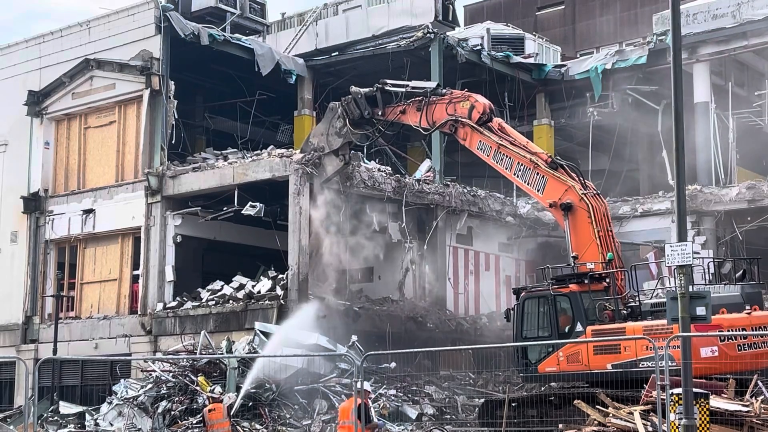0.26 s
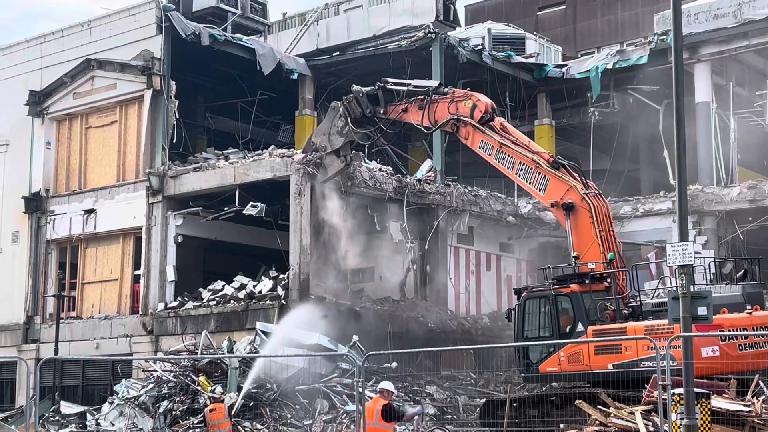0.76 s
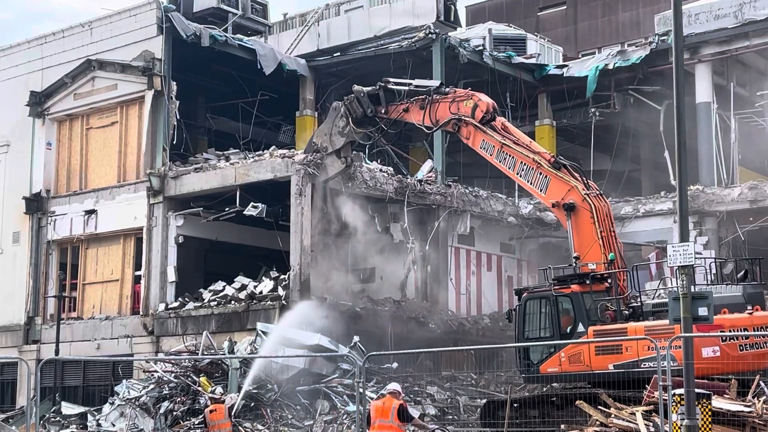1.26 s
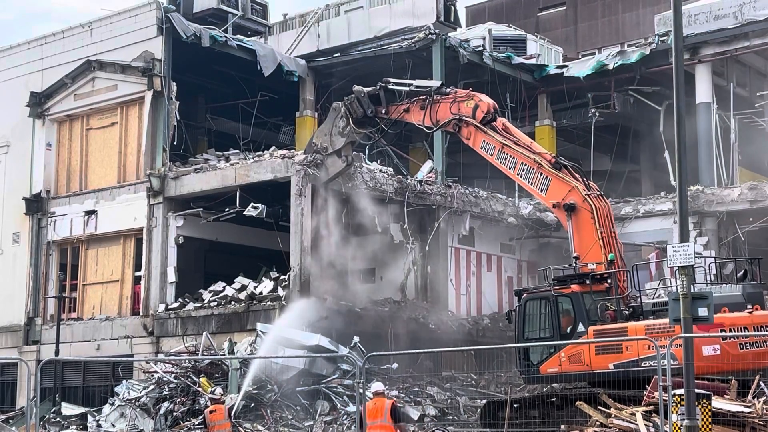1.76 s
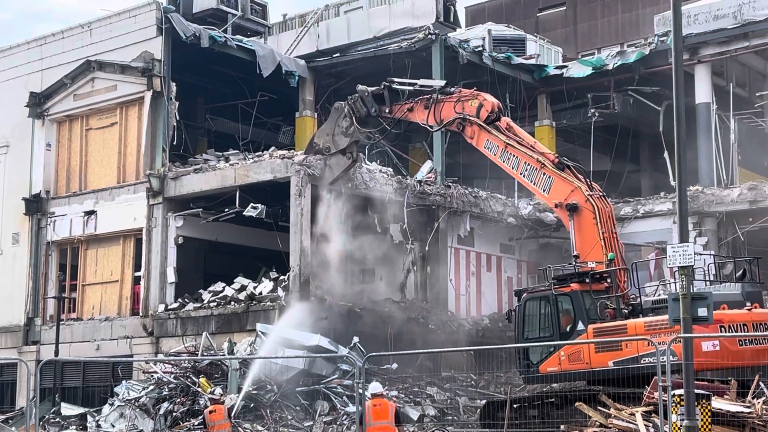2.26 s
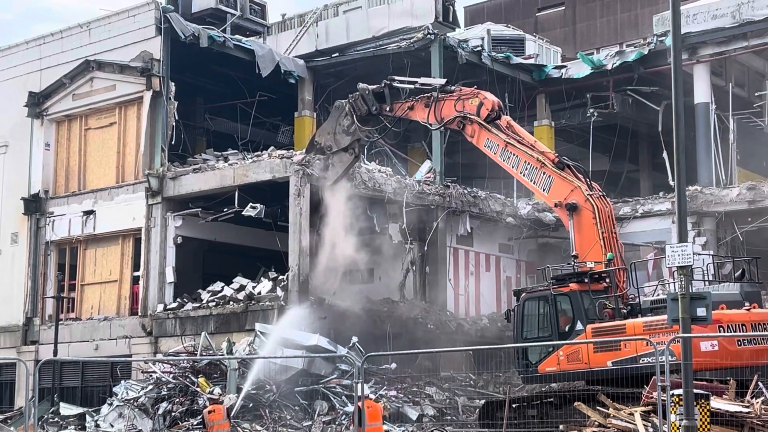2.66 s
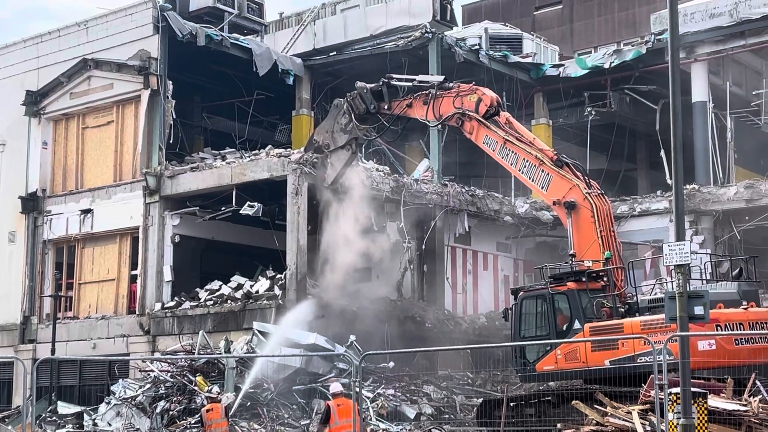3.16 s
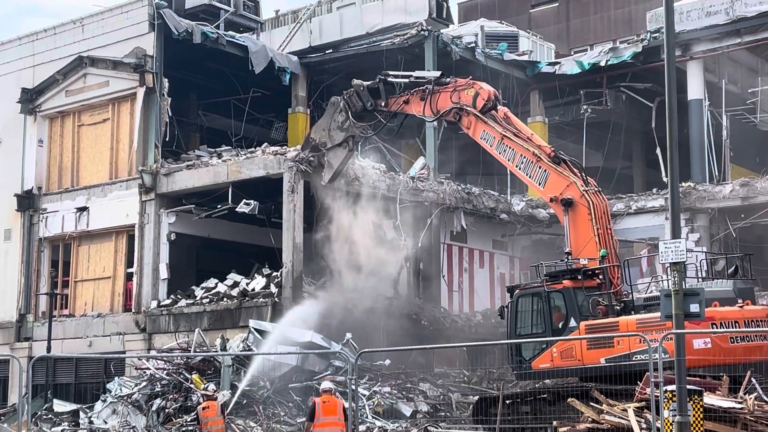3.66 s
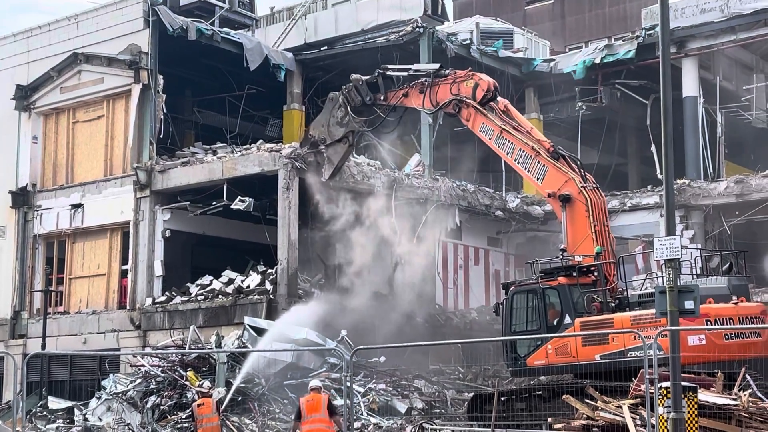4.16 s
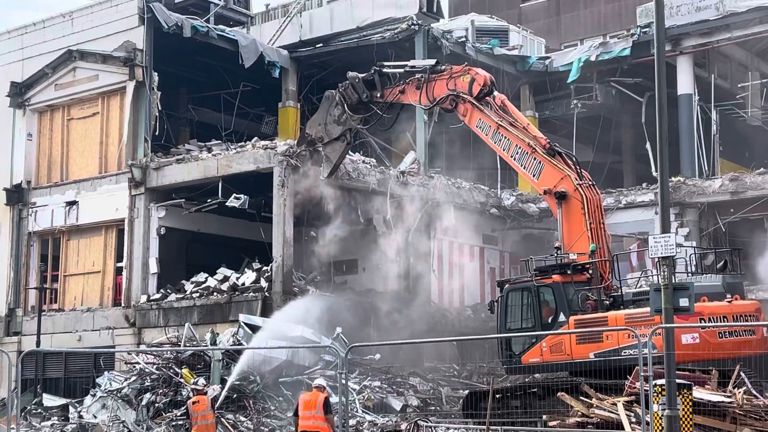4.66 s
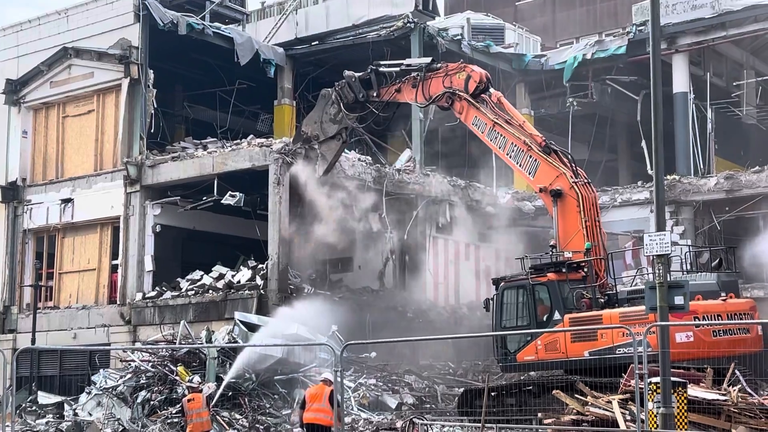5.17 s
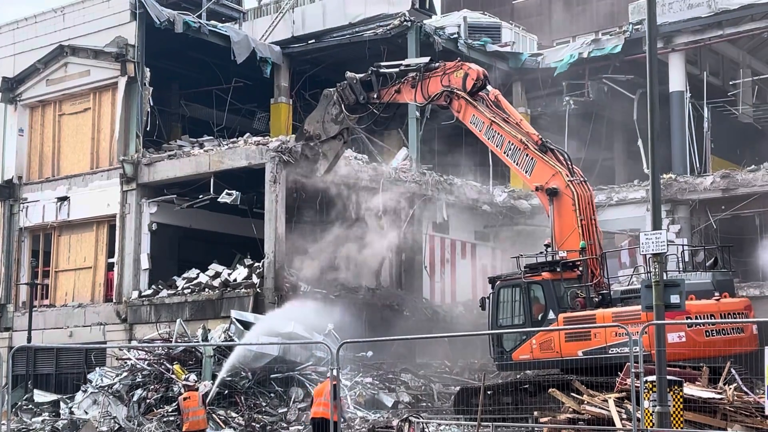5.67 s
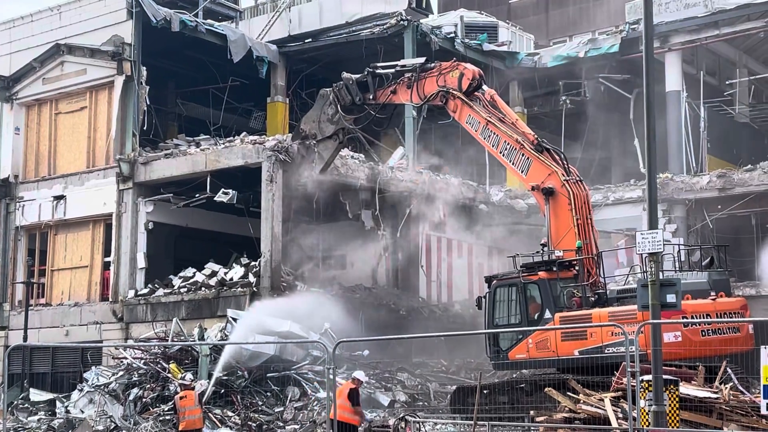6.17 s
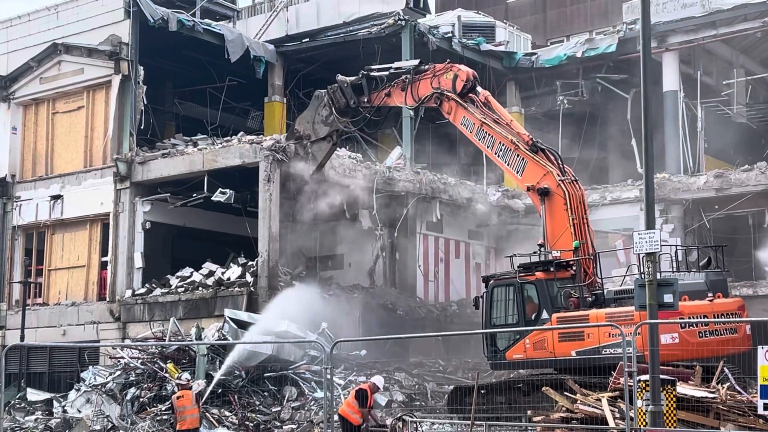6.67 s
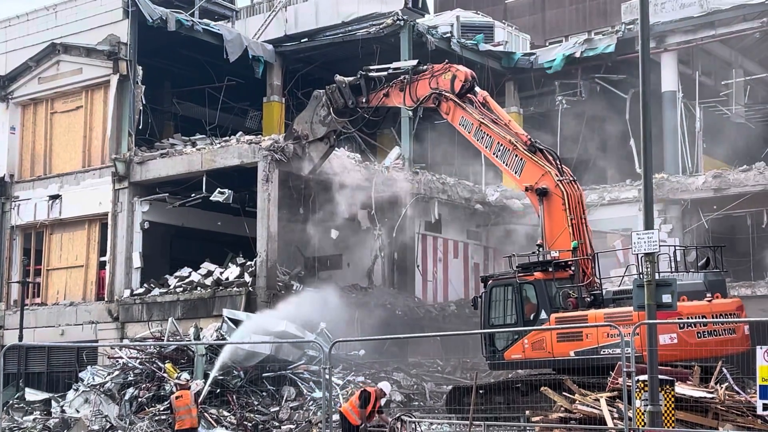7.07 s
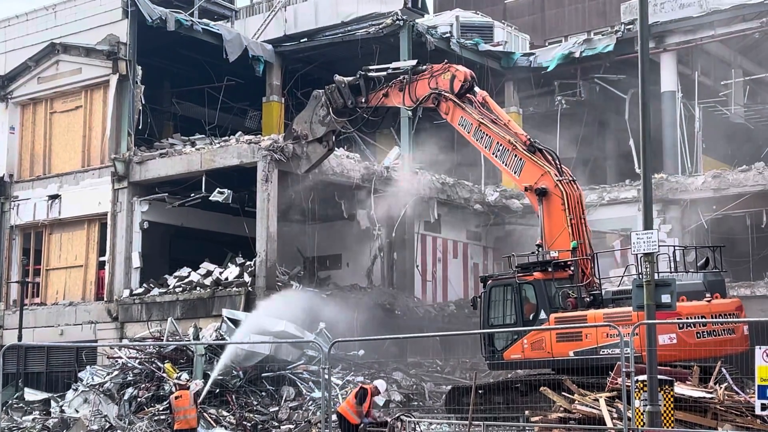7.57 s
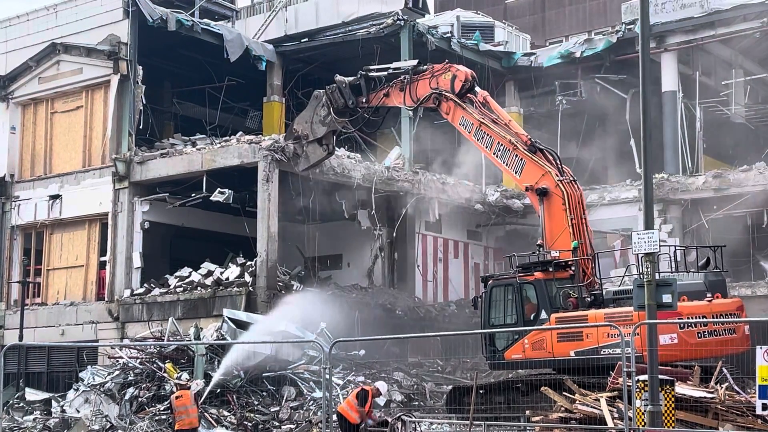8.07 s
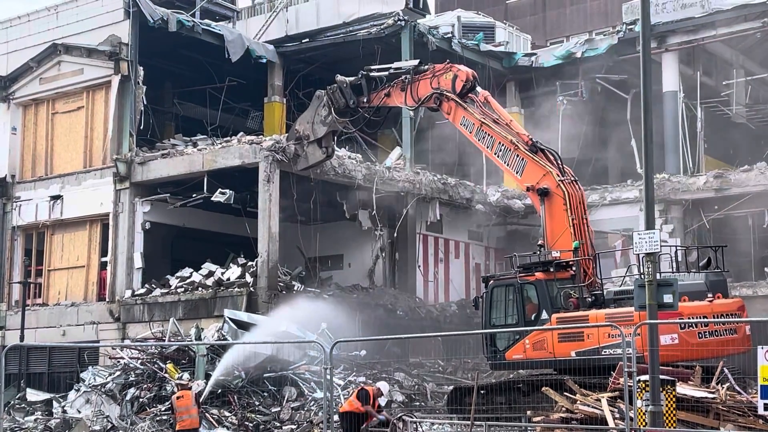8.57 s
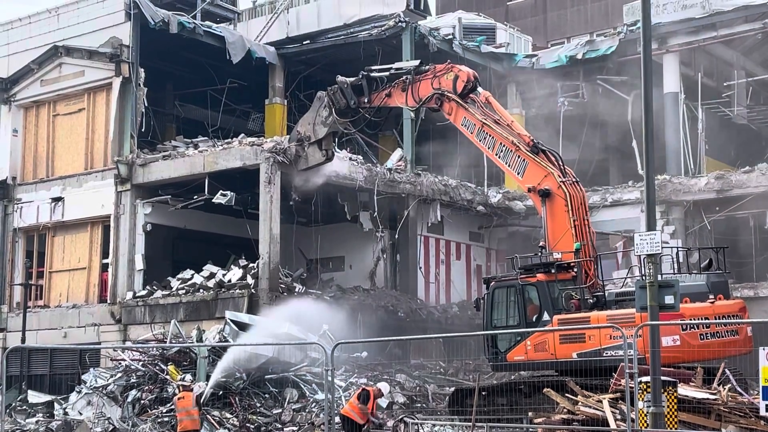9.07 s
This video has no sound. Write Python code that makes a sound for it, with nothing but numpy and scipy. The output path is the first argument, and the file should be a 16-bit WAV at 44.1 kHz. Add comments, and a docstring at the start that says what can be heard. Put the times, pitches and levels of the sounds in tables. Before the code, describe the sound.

Outdoors across a street from a demolition site, in stereo, with a diffuse echo under a second long from the house fronts. From 0 to about 4.3 s lumpy low gusts buffet the microphone, heaviest before 2.5 s. Beneath them a diesel engine on the right knocks rapidly, a hose hisses and fine grit trickles steadily. Sharp concrete cracks with showers of splinters come near 1.2, 2.2, 3 and 3.5 s, with thin high squeaks and a short metallic groan at 2.2 s. At 5.1 s a bright clank and crack start a tumble; the engine drone swells, and heavy blocks crash down at 5.6 to 6 s, the loudest thud just before 6 s. Smaller clanks, crunches and settling stones follow to 7.5 s, the engine dipping briefly near 6.9 s. A tiny steel chirp sounds at 8.3 s, then jaws grind in coarse bites from 8.6 s to the end at about 9.3 s, with low wind rumble returning.

```python
"""An excavator's hydraulic crusher breaks a concrete building, heard from across the street.
Cracks, splinters, rubble and clanks are noise or ringing modes under short envelopes, echoed by the house fronts.
A diesel engine knocks at its firing rate; grit trickles and a hose hisses against the dust, both from noise.
Gusts of low-passed turbulence buffet the microphone, mostly in the first half."""
import sys
import numpy as np
from scipy import signal
from scipy.fft import rfft, irfft, next_fast_len
from scipy.io import wavfile
from scipy.ndimage import uniform_filter1d

SR = 44100
rng = np.random.default_rng(int(sys.argv[2]) if len(sys.argv) > 2 else 0)


def put_to_file(sound):
    """Save the sound as 16-bit audio at rate SR, in the file named by the first command-line argument."""
    columns = np.atleast_2d(sound).T  # one column per channel
    safe = np.clip(columns, -1, 1)
    whole_steps = np.round(safe * 32767)
    wavfile.write(sys.argv[1], SR, whole_steps.astype(np.int16))


N = 411012
TIME = np.arange(N) / SR
# Event levels in the tables are before the dB trims among each function's settings.
# Every *_TONE is a relative spectrum: the coloured sound is scaled to unit rms.


def from_db(db):
    """Decibels to gain."""
    return 10 ** (np.asarray(db) / 20)


def rms_one(x):
    """Scale to unit rms."""
    return x / np.sqrt(np.mean(x ** 2) + 1e-20)


def in_time(rows):
    """Read each column of a breakpoint curve at every sample."""
    s, *columns = np.transpose(rows)
    return [np.interp(TIME, s, column) for column in columns]


def at_hz(points, hz):
    """Read a table on a log-frequency axis."""
    f, value = np.transpose(points)
    return np.interp(np.log(hz + 1e-3), np.log(f), value)


def filtered(x, response):
    """Apply a frequency response, given as a function of Hz."""
    size = next_fast_len(N + SR // 2)
    hz = np.arange(size // 2 + 1) * SR / size
    return irfft(rfft(x, size) * response(hz), size)[..., :N]


def coloured(x, tone):
    """Give a signal a spectrum that falls away beyond its ends; rms 1."""
    lowest, highest = tone[0][0], tone[-1][0]

    def response(hz):
        low_cut = hz ** 2 / (hz ** 2 + (lowest / 2) ** 2)
        high_cut = 1 / (1 + (hz / highest / 2) ** 4)
        return from_db(at_hz(tone, hz)) * low_cut * high_cut
    return rms_one(filtered(x, response))


def drift(rate):
    """Smooth random wander of unit rms; the rate in Hz sets its speed."""
    step = 40  # samples between the points of the wander
    r = np.exp(-2 * np.pi * rate * step / SR)
    noise = rng.standard_normal(N // step + 2002)
    slow = signal.lfilter([1], [1, -2 * r, r * r], noise)[2000:]
    return np.interp(np.arange(N) / step, np.arange(len(slow)), rms_one(slow))


def steadied(x, size=2600):
    """Take the slow swells out of a sound and keep its grain; size in samples."""
    return x / np.sqrt(uniform_filter1d(x ** 2, size=size) + 1e-4)


def blows(times, levels_db, t60s, rise_s):
    """Envelope of blows that swell quickly and die away, summed in power."""
    power = np.zeros(N)
    for s, db, t60 in zip(times, levels_db, t60s):
        start = max(int(s * SR), 0)
        age = TIME[:min(N - start, SR)]
        decay = from_db(db - 60 * age / max(t60, .02))
        power[start:start + len(age)] += (decay * (1 - np.exp(-age / rise_s))) ** 2
    return np.sqrt(power)


def swells(rows, attack_s, release_s):
    """Envelope of sounds that rise, hold for their length and die away, summed in power."""
    power = np.zeros(N)
    for s, length, db in rows:
        start = max(int(s * SR), 0)
        age = TIME[:min(N - start, int((length + 10 * release_s) * SR))]
        rise = np.clip(age / attack_s, 0, 1)
        fall = np.exp(-np.maximum(age - length, 0) / release_s)
        power[start:start + len(age)] += (from_db(db) * rise * fall) ** 2
    return np.sqrt(power)


def stones(tone, per_s, spread_db, cycles, count=22):
    """Stones of many sizes knock at random; each falls by 60 dB in a few cycles of its own pitch."""
    out = np.zeros(N)
    hits = int(per_s * N / SR / count) + 1  # for each size of stone
    for hz in np.geomspace(tone[0][0], min(tone[-1][0], SR / 3), count):
        clicks = np.full(N, 1e-18)
        moments = rng.integers(0, N, hits)
        signs = rng.choice([-1, 1], hits)
        clicks[moments] = signs * from_db(spread_db * np.minimum(rng.exponential(1, hits), 4))
        r, w = from_db(-60 * hz / (cycles * SR)), 2 * np.pi * hz / SR
        ringing = signal.lfilter([1, 0, -1], [1, -2 * r * np.cos(w), r * r], clicks)
        out += np.sqrt(hz) * rms_one(ringing)
    return steadied(coloured(out, tone))


def placed(x, side):
    """Share a sound between left and right, band by band."""
    def shares(hz):
        ratio = from_db(at_hz(side, hz))
        return 2 * np.array([ratio, np.ones_like(ratio)]) / (1 + ratio)
    return filtered(x, shares)


# echo between the house fronts: (f/Hz, level/dB against the direct sound)
STREET_ECHO = [(60, -22), (250, -7), (600, -4.5), (2100, -5.5), (3200, -29), (12000, -10.5)]
STREET_T60_S = 0.81


def street(x):
    """Add the diffuse echo of the house fronts as decaying noise, different in each ear."""
    age = TIME[:SR]
    late = age > .006  # the first reflection needs time to return
    tail = rng.standard_normal((2, SR)) * from_db(-60 * age / STREET_T60_S) * late
    echo = signal.fftconvolve(x, rms_one(tail) / np.sqrt(SR), axes=-1)[:, :N]
    return x + filtered(echo, lambda hz: from_db(at_hz(STREET_ECHO, hz)))


def turbulence(tone, apart, size):
    """Wind noise common to both microphone ports, plus a share that differs between them."""
    common = steadied(coloured(rng.standard_normal(N), tone), size=size)
    return common + apart * coloured(rng.standard_normal((2, N)), tone)


# single eddies within the gusts: (t/s, length/s, level/dB, treble/dB relative to that level)
EDDIES = [(0.005, 0.032, -22.5, 4), (0.038, 0.0093, -24, 7), (0.087, .026, -15.5, 4.5),
          (0.141, 0.029, -17.5, 4.5), (0.229, 0.043, -16.5, 2.5), (0.301, .022, -17.5, -5),
          (0.335, 0.011, -20, 2), (0.825, 0.01, -15.5, -14), (0.874, 0.047, -17.5, -17),
          (0.93, 0.016, -10.5, -0.5), (0.992, 0.017, -19, 7), (1.037, 0.017, -23, 5),
          (1.074, 0.012, -18, 0), (1.108, 0.015, -14.5, -0.5), (1.154, 0.03, -20, 8.5),
          (1.192, 0.014, -19.5, 9.5), (1.262, 0.037, -16.5, 4.5), (1.336, .016, -12, -1),
          (1.378, 0.04, -13, -3), (1.464, 0.02, -10, 4), (1.515, .014, -25, 7), (1.599, 0.036, -19.5, 3.5),
          (1.666, 0.017, -24, -4), (1.78, 0.01, -14.5, -9), (1.829, .014, -24.5, 4),
          (1.957, 0.023, -23, -4), (2.127, 0.015, -17.5, 4), (2.191, 0.01, -18, -8),
          (2.239, 0.022, -12, -9), (2.48, 0.011, -20, -9), (2.522, 0.021, -28, 4),
          (2.593, 0.0092, -25.5, -2), (2.62, .017, -23, -9), (2.665, 0.02, -21, -14), (2.814, .012, -21, 0),
          (2.844, .012, -16.5, -7), (2.885, 0.013, -23, -12), (3.17, 0.022, -21, -7),
          (3.271, .016, -17.5, -15), (3.323, .024, -19, -16), (3.357, 0.028, -21, -10),
          (3.394, 0.041, -20.5, -12), (3.518, .035, -18.5, 2.5), (3.599, 0.018, -17, 1),
          (3.696, .016, -17.5, 0), (3.731, .012, -21, -1), (3.791, 0.03, -22.5, -4),
          (3.971, 0.0072, -19, -12), (4.015, .01, -19, -17), (4.354, .01, -20.5, -14)]
EDDY_ATTACK_S, EDDY_RELEASE_S = 0.0059, 0.011


def eddies():
    """Envelopes of the body and the treble of the eddies, each with its own edge."""
    s, length, db, treble_db = np.transpose(EDDIES)
    body = swells(zip(s, length, db), EDDY_ATTACK_S, EDDY_RELEASE_S)
    treble = swells(zip(s, length, db + treble_db), EDDY_ATTACK_S, EDDY_RELEASE_S)
    return body, treble


# steady breeze, as its rumble: (t/s, level/dB)
BREEZE = [(0.0, -18.5), (.3, -27.5), (0.44, -37.5), (.6, -26.5), (.74, -33), (1.0, -26.5), (1.58, -22),
          (1.72, -30), (1.91, -36), (2.2, -25), (2.42, -33.5), (2.6, -28.5), (2.93, -28.5), (3.03, -31),
          (3.14, -27), (3.5, -31), (3.77, -31.5), (3.9, -29.5), (4.18, -37), (4.42, -35.5), (4.58, -36.5),
          (4.8, -33.5), (5.86, -26.5), (7.09, -33.5), (7.4, -28), (7.89, -31.5), (9.03, -22.5),
          (9.32, -26.5)]
# gusts on top of the breeze: (t/s, length/s, strength level/dB, rumble level/dB)
GUSTS = [(0.0, 0.36, -25.5, -22.5), (0.83, 0.12, -30, -27), (0.924, 0.035, -20, -19),
         (0.997, 0.22, -24.5, -32), (1.256, 0.047, -22, -23), (1.386, 0.066, -22.5, -17),
         (1.522, 0.18, -26, -27), (1.722, 0.14, -30, -20), (1.95, 0.15, -28.5, -23.5),
         (2.108, 0.24, -28, -30), (2.612, 0.17, -33.5, -35), (2.808, .16, -28.5, -31),
         (3.17, 0.059, -27.5, -30), (3.305, 0.16, -29.5, -38), (3.536, 0.12, -26, -24),
         (3.694, 0.045, -25, -24.5), (3.79, 0.044, -32.5, -31), (3.974, 0.11, -34.5, -26),
         (4.239, 0.028, -48, -22), (4.34, 0.038, -41, -26), (8.42, 0.87, -42, -23),
         (9.035, 0.13, -38, -18.5)]
GUST_ATTACK_S, GUST_RELEASE_S = 0.0074, 0.029
# spectra of the pressure rumble and of the gusts: (f/Hz, level/dB per Hz)
RUMBLE_TONE = [(20, -36), (32, -24), (45, 0), (65, 1.5), (110, -1.5), (180, -9.5), (300, -21), (600, -36)]
GUST_TONE = [(40, -27), (85, 1), (160, -0.5), (260, 2.5), (480, -1), (720, -9), (1000, -21), (1600, -47)]
# balance of the wind: (f/Hz, left minus right level/dB)
WIND_SIDE = [(100, -0.5), (200, -0.5), (700, -4.5)]


def wind(breeze_db=2.0, gust_db=1.5, gust_rumble_db=-1, lumps_db=2.5, heave_db=2.5, fine_db=4,
         brightening=0.6, gust_apart=0.34, rumble_apart=0.23):
    """Lumpy turbulence at the ports; the stronger a gust, the higher it reaches."""
    s, length, strength_db, rumble_db = np.transpose(GUSTS)
    gusting = swells(zip(s, length, strength_db + gust_db), GUST_ATTACK_S, GUST_RELEASE_S)
    gusting = gusting * from_db(lumps_db * drift(40))
    fine_gusting = gusting * from_db(fine_db) * (gusting / from_db(-11.0)) ** brightening
    eddying, fine_eddying = eddies()
    swirl = turbulence(GUST_TONE, gust_apart, size=600)
    large = filtered(swirl, lambda hz: 1 / (1 + (hz / 500) ** 4))
    fine = swirl - large
    gusts = np.hypot(gusting, eddying) * large + np.hypot(fine_gusting, fine_eddying) * fine
    # the rumble is mostly the same on both ports
    pushing = swells(zip(s, length, rumble_db + gust_rumble_db), GUST_ATTACK_S, GUST_RELEASE_S)
    breeze = from_db(in_time(BREEZE)[0] + breeze_db)
    pressure = np.hypot(breeze, pushing) * from_db(heave_db * drift(18.6))
    return placed(gusts + pressure * turbulence(RUMBLE_TONE, rumble_apart, size=2600), WIND_SIDE)


# hiss of the water jet as the hose is swung: (t/s, level/dB)
SPRAY = [(0.0, -49.5), (0.57, -45.5), (1.22, -49.5), (5.06, -49.5), (5.58, -43.5), (6.31, -49), (6.88, -49),
         (8.33, -50.5), (8.54, -54.5), (9.32, -49)]
# spectrum of the hiss: (f/Hz, level/dB per Hz)
SPRAY_TONE = [(100, -21), (500, -17), (1200, -16), (2200, 7.5), (3500, 8), (4700, 5), (5300, 7.5),
              (7500, 0.5), (11000, 1.5), (13500, -3), (15500, -13)]


def spray(spray_db=8, splash_db=2.0):
    """The water jet hisses as coloured noise of wandering level."""
    level_db = in_time(SPRAY)[0] + spray_db + splash_db * drift(8.5)
    return from_db(level_db) * coloured(rng.standard_normal(N), SPRAY_TONE)


# grit trickling down the building's front: (t/s, level/dB)
TRICKLE = [(0.0, -31), (0.75, -40.5), (1.4, -33.5), (1.63, -41), (2.75, -39.5), (3.79, -36), (4.65, -36.5),
           (5.19, -34), (5.37, -32.5), (6.7, -35), (6.9, -35), (7.37, -37.5), (8.8, -36.5), (9.32, -35)]
# spectrum of the grit: (f/Hz, level/dB per Hz)
TRICKLE_TONE = [(300, 13), (900, 11.5), (1800, 6.5), (2200, 2.5), (3400, 0), (4700, -10), (5600, -1),
                (7500, -7), (14000, -56)]


def trickle(trickle_db=-1, surge_db=1.0):
    """Dense small knocks of grit keep running down the front in surges."""
    grains = stones(TRICKLE_TONE, per_s=6000, spread_db=3, cycles=18)
    return from_db(in_time(TRICKLE)[0] + trickle_db + surge_db * drift(13.0)) * grains


# engine exhaust: (t/s, level/dB)
EXHAUST = [(0, -31), (.48, -37), (.6, -31.5), (.8, -31.5), (4.3, -33), (4.65, -36.5), (4.85, -25),
           (5.6, -21.5), (6.0, -24.5), (6.3, -28.5), (6.85, -38), (7.15, -22), (8.3, -24), (9.32, -24.5)]
# lines of the exhaust drone: (multiple of the firing rate, level/dB)
EXHAUST_LINES = [(5, -2.5), (6, 2.5), (7, 2.5), (8, -1), (9, -2.5), (10, -5), (11, -3), (13, -25),
                 (14, -14), (15, -14.5), (16, -17), (17, -19), (18, -22)]
# spectrum of the gas flutter: (f/Hz, level/dB per Hz)
EXHAUST_TONE = [(40, -30), (80, -14), (130, 5), (180, 0.5), (250, -2.5), (290, -17), (420, -17), (650, -32)]


def exhaust(turns, exhaust_db=-1, waver_db=1.1, gas_db=-10, puff=0.38):
    """The silencer smears the puffs into a drone whose lines each waver, over a flutter of gas."""
    drone = np.zeros(N)
    for k, db in EXHAUST_LINES:
        line = np.sin(2 * np.pi * (k * turns + rng.random()))
        drone += from_db(db + waver_db * drift(3.7)) * line
    puffing = 1 + puff * np.cos(2 * np.pi * turns)
    gas = coloured(rng.standard_normal(N) * puffing, EXHAUST_TONE)
    mixed = rms_one(rms_one(drone) + from_db(gas_db) * gas)
    return from_db(in_time(EXHAUST)[0] + exhaust_db) * mixed


# spectrum of the metallic knock: (f/Hz, level/dB per Hz)
KNOCK_TONE = [(150, 17), (350, 12.5), (550, -8), (800, -1.5), (1250, 5.5), (1900, 1), (2200, -13),
              (2700, 4), (4500, -50), (9000, -20)]


def knocks(turns, knock_db=-39.0, rattle=1.4, uneven_db=1.0):
    """Every firing strikes the block with a repeated ring and a clatter that is new each time."""
    firings = np.diff(np.floor(turns), prepend=0) * from_db(uneven_db * drift(32))

    def struck(shape):
        return signal.fftconvolve(firings, shape)[:N]
    age = TIME[:SR // 6]
    dying = from_db(-60 * age / .125)
    block = rms_one(struck(dying * rng.standard_normal(len(age))))
    clatter = rms_one(struck(dying) * rng.standard_normal(N))
    return from_db(knock_db) * coloured(block + rattle * clatter, KNOCK_TONE)


# the engine stands to the right: (f/Hz, left minus right level/dB)
ENGINE_SIDE = [(60, -7), (200, -3), (700, -9), (1290, -44), (2400, -13), (3500, -1)]
FIRING_HZ = 23.72  # mean rate


def engine(wander=.004):
    """A slightly wandering firing rate drives both the exhaust and the metallic knock."""
    turns = np.cumsum(FIRING_HZ * (1 + wander * drift(0.703))) / SR  # counted in firings
    return placed(exhaust(turns) + knocks(turns), ENGINE_SIDE)


# thin squeaks: (t/s, length/s, level/dB, pitch f/Hz)
SQUEAKS = [(0.105, .085, -37.5, 5115), (0.22, .06, -46, 5100), (2.202, 0.12, -43.5, 5090),
           (4.5, .03, -51, 5110), (4.717, 0.097, -45, 5115), (5.24, .05, -48.5, 5110),
           (6.785, .02, -44, 5110), (6.88, .015, -47, 5100), (8.45, .08, -52, 5120), (9.04, .04, -45, 5100)]
SQUEAK_WIDTH_HZ = 58  # rms wander of the pitch
SQUEAK_ATTACK_S, SQUEAK_RELEASE_S = .012, 0.066


def squeaks():
    """A thin, rough, flickering tone starts quickly, holds and fades."""
    s, length, db, hz = np.transpose(SQUEAKS)
    pitch = np.interp(TIME, s, hz) + SQUEAK_WIDTH_HZ * drift(230)
    tone = np.sin(2 * np.pi * np.cumsum(pitch) / SR)
    flicker = from_db(4 * drift(45))
    envelope = swells(zip(s, length, db), SQUEAK_ATTACK_S, SQUEAK_RELEASE_S)
    return envelope * steadied(tone * flicker, size=5000)


# steel slipping under load gives a short groan: (t/s, f/Hz, level/dB)
GROAN = [(2.2, 905, -48), (2.222, 904, -33), (2.243, 865, -25), (2.262, 872, -31), (2.29, 885, -58)]
# its harmonics: (multiple of the pitch, level/dB)
GROAN_LINES = [(1, 0.5), (2, -9), (3, -10), (4, -14), (5, -11.5)]


def groan(level_db=-1.5):
    """Stick and slip repeat fast enough to give a rough pitch, its overtones flickering."""
    hz, db = in_time(GROAN)
    turns = np.cumsum(hz * (1 + .028 * drift(190))) / SR
    tone = np.zeros(N)
    for k, line_db in GROAN_LINES:
        tone += from_db(line_db + 3 * drift(70)) * np.sin(2 * np.pi * k * turns)
    sounding = (TIME > GROAN[0][0]) & (TIME < GROAN[-1][0])
    return from_db(db + level_db) * tone * sounding


# a steel bar chirps as it slips on concrete: (t/s, f/Hz, level/dB)
SCRAPE = [(8.3, 1803, -43), (8.328, 1916, -36), (8.338, 2015, -21), (8.349, 2090, -42), (8.37, 2050, -55)]


def scrape(level_db=2, catch_db=-0.5):
    """The bar catches, then slips with one short, mostly rising chirp."""
    hz, db = in_time(SCRAPE)
    tone = np.sin(2 * np.pi * np.cumsum(hz * (1 + .015 * drift(200))) / SR)
    sounding = (TIME > SCRAPE[0][0]) & (TIME < SCRAPE[-1][0])
    return from_db(db + level_db + catch_db * drift(70)) * tone * sounding


# reinforcing steel and beams being struck: (t/s, peak level/dB, pitch f/Hz, t60/s, t60 of the chatter/s)
CLANKS = [(2.049, -22, 1940, 0.037, 0.064), (3.016, -30, 1090, .15, .1), (5.148, -14, 1005, .09, 0.13),
          (5.255, -26, 1010, .08, .15), (5.43, -22, 987, .08, 0.32), (5.884, -13, 924, 0.089, 0.26),
          (6.333, -19, 937, 0.098, 0.3), (6.625, -23.5, 861, 0.12, 0.44), (6.77, -28, 848, .09, .2),
          (6.93, -16.5, 1157, 0.094, 0.2)]
# modes of the steel: (multiple of the pitch, level/dB)
STEEL = [(1, 0.5), (1.07, -3), (1.18, -7), (1.73, -8), (1.98, -11), (2.72, -8), (3.5, -10), (4.38, -18)]


def clanks(level_db=-5, chatter=0.75):
    """A chunk hits steel and chatters on it; later touches excite each mode with their own strength."""
    out, age = np.zeros(N + SR), TIME[:SR // 2]
    for s, db, hz, t60, chatter_t60 in CLANKS:
        touching = rng.random(len(age)) < 350 / SR  # 350 touches a second on average
        contacts = chatter * touching * from_db(-60 * age / chatter_t60)
        start = int(s * SR)
        for k, mode_db in STEEL:
            touches = contacts * rng.standard_normal(len(age))
            touches[0] = 1  # the first hit
            decay = from_db(mode_db - 60 * age * np.sqrt(k) / t60)  # higher modes die sooner
            mode = decay * np.sin(2 * np.pi * k * hz * age)
            ring = signal.fftconvolve(touches, mode)[:len(age)]
            ring = ring / np.sqrt(np.sum(touches ** 2))
            out[start:start + len(age)] += from_db(db + level_db) * ring
    return out[:N]


# chunks crumbling as they land or are crushed: (t/s, level/dB, t60/s, pitch of the stones f/Hz)
CRUNCHES = [(2.049, -28, 0.1, 2000), (3.012, -30.5, 0.25, 1150), (3.24, -34, .3, 1860),
            (5.146, -27, 0.22, 1050), (5.425, -29.5, .5, 950), (5.883, -20, 0.46, 830),
            (6.334, -25.5, 0.48, 930), (6.617, -26.5, .55, 878), (6.931, -24, 0.25, 1230),
            (8.291, -29, 0.51, 1754), (8.928, -21, 0.22, 900), (9.06, -24, .6, 880),
            (9.145, -20.5, 0.39, 830), (9.27, -27, .5, 800)]
# colour of a crunch: (multiple of its pitch, level/dB per Hz)
CRUNCH_TONE = [(.66, -11), (.93, 5.5), (1.15, 4.5), (1.5, -0.5), (2, -11), (2.4, -9), (3, -21), (4, -26.5)]


def crunches(level_db=-2):
    """A chunk bursts into coarse stones that knock together and settle; smaller stones ring higher."""
    middle_hz = 900
    tone = [(k * middle_hz, db) for k, db in CRUNCH_TONE]
    heap = stones(tone, per_s=1000, spread_db=3, cycles=20)
    out = np.zeros(N)
    for s, db, t60, hz in CRUNCHES:
        # play the heap faster or slower to reach the pitch, looping at its end
        pitched = np.interp((TIME * hz / middle_hz) % TIME[-1], TIME, heap)
        out += blows([s], [db + level_db], [t60], rise_s=0.0019) * pitched
    return out


# heavy pieces landing: (t/s, peak level/dB, t60/s)
THUDS = [(4.277, -18, 0.073), (4.933, -16.5, 0.083), (5.613, -9.5, 0.19), (5.664, -9, 0.17),
         (5.755, -10.5, .16), (5.881, -4, 0.12), (5.909, -5.5, 0.14), (5.94, -5, 0.11), (5.966, 3.5, 0.1),
         (6.056, -6.5, 0.093), (6.429, -17, 0.12), (6.628, -17, 0.11), (7.425, -16, 0.095)]
# spectrum of a thud: (f/Hz, level/dB per Hz)
THUD_TONE = [(40, -23), (100, -12), (160, 0), (240, 10), (340, 6), (480, -2), (700, -12), (1500, -47)]


def thuds(thud_db=-6):
    """Heavy pieces land with a quick low burst of knocking blocks."""
    s, peak_db, t60 = np.transpose(THUDS)
    blocks = stones(THUD_TONE, per_s=2300, spread_db=0.5, cycles=14.4)
    return blows(s, peak_db + thud_db, t60, rise_s=0.002) * blocks


LURCH_DB = 1.5  # rms unevenness of tumbling and grinding
# masonry tumbling down in runs: (t/s, length/s, level/dB)
TUMBLES = [(5.15, 0.45, -33), (5.61, .26, -28), (5.88, 0.082, -18.5), (6.055, .02, -23),
           (6.29, 0.36, -32.5)]
TUMBLE_ATTACK_S, TUMBLE_RELEASE_S = 0.016, 0.019
# spectrum of the tumbling: (f/Hz, level/dB per Hz)
TUMBLE_TONE = [(60, -11), (130, -2), (220, 4), (350, 5.5), (550, -5.5), (950, -5.5), (1400, -16.5),
               (3000, -29)]


def tumbling():
    """Runs of dull stone knocks roll down with a lurching level."""
    rolling = stones(TUMBLE_TONE, per_s=2500, spread_db=2.5, cycles=9)
    return swells(TUMBLES, TUMBLE_ATTACK_S, TUMBLE_RELEASE_S) * rolling * from_db(LURCH_DB * drift(34))


# jaws biting into the floor slab: (t/s, length/s, level/dB, treble/dB relative to that level)
BITES = [(8.643, .025, -24, -12), (8.685, .025, -25, -13), (8.765, .02, -28.5, -6), (8.838, 0.033, -23, -3),
         (8.924, 0.087, -21.5, -0.5), (9.054, 0.07, -20.5, 1), (9.133, 0.058, -17.5, 1),
         (9.242, 0.013, -21.5, 3), (9.266, .06, -18.5, -0.5)]
BITE_ATTACK_S, BITE_RELEASE_S = 0.0057, 0.017
# spectrum of the grinding: (f/Hz, level/dB per Hz)
GRIND_TONE = [(80, 0), (200, -10), (380, 12), (600, 1), (900, 4.5), (1300, -12), (2200, -15), (4200, -27.5),
              (6200, -18.5), (8500, -39)]


def grinding():
    """The jaws grind through the slab, bite after bite, each with its own brightness."""
    s, length, db, treble_db = np.transpose(BITES)
    crushing = stones(GRIND_TONE, per_s=5000, spread_db=2.5, cycles=14)
    dull = filtered(crushing, lambda hz: 1 / (1 + (hz / 650) ** 6))
    bright = crushing - dull
    biting = swells(zip(s, length, db), BITE_ATTACK_S, BITE_RELEASE_S)
    bright_biting = swells(zip(s, length, db + treble_db), BITE_ATTACK_S, BITE_RELEASE_S)
    return (biting * dull + bright_biting * bright) * from_db(LURCH_DB * drift(34))


CHIPS_PER_S, CHIP_DB, CHIP_SPREAD_DB, CHIP_T60_S = 6.7, -38, 2, 0.097


def chips():
    """Envelope of small chips snapping off at random, each with its own moment and size."""
    count = int(CHIPS_PER_S * N / SR)
    when, size = rng.random((count, 2)).T
    levels_db = CHIP_DB + CHIP_SPREAD_DB * (2 * size - 1)
    return blows(when * (N - 1) / SR, levels_db, np.full(count, CHIP_T60_S), rise_s=0.001)


# brittle snaps: (t/s, peak level/dB, t60/s)
SNAPS = [(0.194, -23, 0.094), (1.199, -27, .06), (2.052, -23, 0.062), (3.299, -29, 0.054),
         (3.536, -24, 0.22), (4.548, -28, .11), (4.91, -23, 0.054), (5.147, -26, 0.08), (5.421, -30, .08),
         (5.613, -20, 0.076), (5.7693, -22, 0.1), (5.958, -14.5, 0.077), (6.894, -26, .09),
         (6.932, -22, 0.087), (7.045, -23, 0.071), (8.226, -23, .06), (8.374, -25, .07),
         (8.99, -22.5, 0.21), (9.054, -27, .16)]


def snaps(snap_db=-7):
    """Envelope of brittle snaps, with a very fast rise."""
    s, peak_db, t60 = np.transpose(SNAPS)
    return blows(s, peak_db + snap_db, t60, rise_s=0.00065)


# concrete breaking: (t/s, strength level/dB, splinters/dB relative to that, t60 of the shower/s)
BREAKS = [(0.196, -44, 0, 0.36), (0.655, -32.5, 0.5, 0.21), (1.198, -25, -11, 0.32),
          (1.255, -24.5, -14, 0.25), (1.549, -30.5, -6, 0.29), (2.234, -35.5, -1, 0.27),
          (3.01, -31.5, -6, 0.23), (3.238, -35.5, -0.5, 0.2), (3.299, -37, 1.5, 0.45),
          (3.531, -24.5, -7, 0.43), (3.675, -29.5, -8, 0.64), (4.154, -35, -0.5, 0.48),
          (4.55, -33.5, -3, 0.27), (5.145, -21.5, -5.5, 0.55), (5.255, -26, -21, 0.32),
          (5.424, -25, -3.5, 1), (5.611, -26.5, -17.5, 0.82), (5.885, -23, -14, 0.31),
          (6.33, -32, -7, 0.33), (6.617, -29.5, -11, 0.68), (6.931, -26.5, -4.5, 0.79),
          (7.039, -32.5, -4.5, 1), (7.553, -29, -5.5, 0.7), (8.225, -43, 0, 0.22), (8.291, -29, -9.5, 1),
          (8.929, -28, -10, 0.86), (9.052, -27, -9, 0.75)]
# spectra of the coarse stones and of the splinters: (f/Hz, level/dB per Hz)
CRACK_TONE = [(200, -21), (500, -6.5), (1000, 1.5), (1400, -1), (1900, -0.5), (2300, -10.5), (2700, -7.5),
              (3100, -13.5), (3500, -9), (4000, -13)]
SPLINTER_TONE = [(1200, -54), (2500, 5), (3600, 4.5), (4700, 0), (5600, 5), (7500, -4), (11000, -7),
                 (15500, -17)]


def cracking(crack_db=-1, crack_t60=0.19, stones_db=-2):
    """Each break is a short crack, then a shower of stones and a brighter one of splinters."""
    s, db, treble_db, t60 = np.transpose(BREAKS)
    crack = blows(s, db + crack_db, np.full(len(s), crack_t60), rise_s=0.00029)
    shower = blows(s, db + stones_db, t60, rise_s=0.0091)
    splinters = blows(s, db + treble_db, t60, rise_s=0.0011)
    coarse = stones(CRACK_TONE, per_s=2200, spread_db=2.5, cycles=28)
    fine = stones(SPLINTER_TONE, per_s=6500, spread_db=2.8, cycles=16)
    brittle = np.sqrt(splinters ** 2 + snaps() ** 2 + chips() ** 2)
    return np.hypot(crack, shower) * coarse + brittle * fine


# balance of the rubble, steel and water: (f/Hz, left minus right level/dB)
RUBBLE_SIDE = [(60, 4), (200, -2.5), (600, -3), (1150, -3.5), (1700, -5), (2400, 5.5), (3500, 0)]


def scene():
    """The site echoes in the street; the wind is right at the microphone."""
    steel = squeaks() + groan() + scrape() + clanks()
    rubble = crunches() + thuds() + tumbling() + grinding() + cracking()
    site = engine() + placed(spray() + trickle() + steel + rubble, RUBBLE_SIDE)
    return wind() + street(site)


# phase between the two microphone channels: (f/Hz, phase/rad)
PORT_PHASE = [(0, 0), (260, -.2), (1030, -.2), (1380, .3), (1890, .4), (2150, .7), (2410, -.1), (2840, -.6),
              (3530, 0), (5060, -.1), (5320, 2.2), (6300, 2.4), (7150, 3.3), (7410, 4.1), (7670, 6.28),
              (10200, 6.3), (10400, 7.5), (11800, 9.4), (13600, 9.5), (14400, 10.9), (14800, 12.5)]
CUTOFF_HZ = 15800


def record(dry):
    """The channels part in phase towards the treble, peaks are rounded, the top is cut."""
    port_hz, radians = np.transpose(PORT_PHASE)
    halves = np.array([[.5], [-.5]])  # each channel takes half of the phase
    wide = filtered(dry, lambda hz: np.exp(1j * np.interp(hz, port_hz, radians) * halves))
    rounded = 1.2 * np.tanh(wide / 1.2)
    return filtered(rounded, lambda hz: 1 / np.sqrt(1 + (hz / CUTOFF_HZ) ** 200))


dry = scene()
out = record(dry)
put_to_file(out)
```